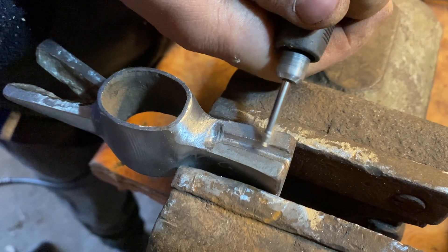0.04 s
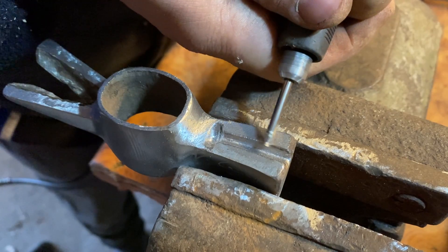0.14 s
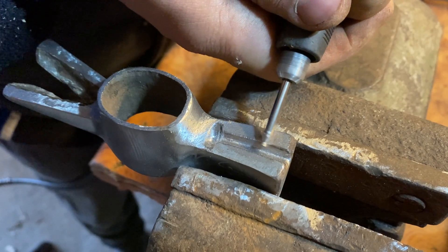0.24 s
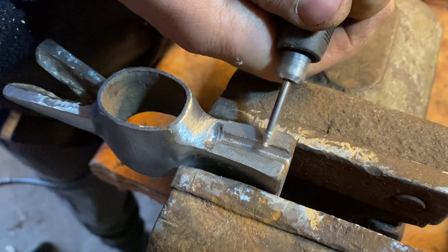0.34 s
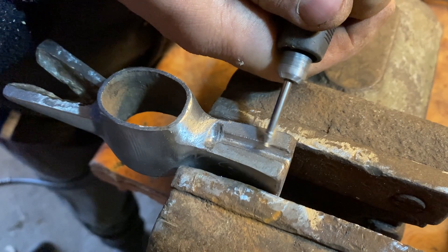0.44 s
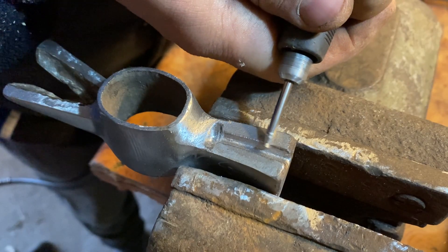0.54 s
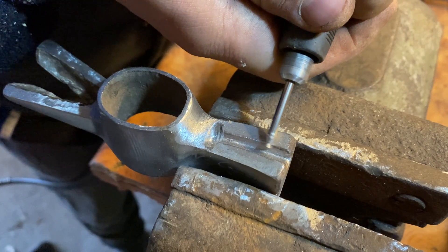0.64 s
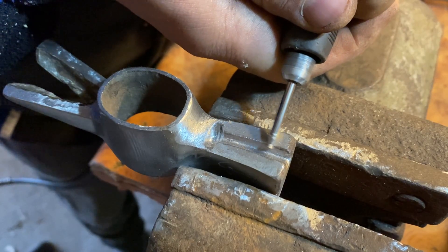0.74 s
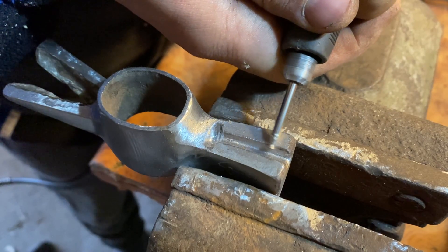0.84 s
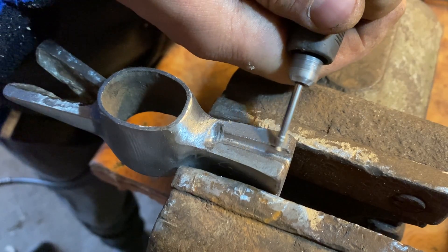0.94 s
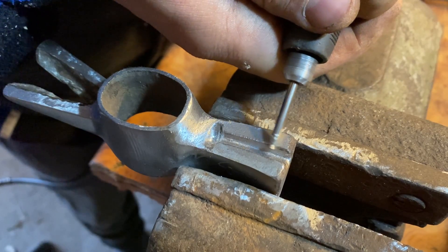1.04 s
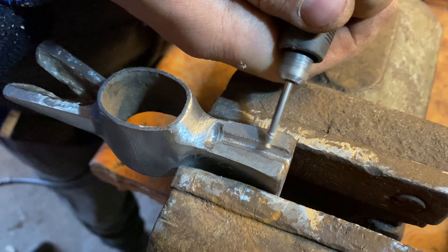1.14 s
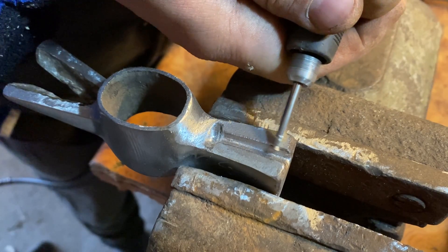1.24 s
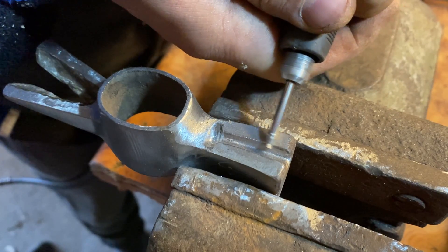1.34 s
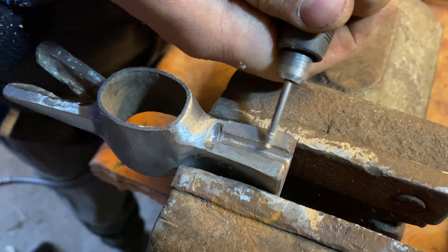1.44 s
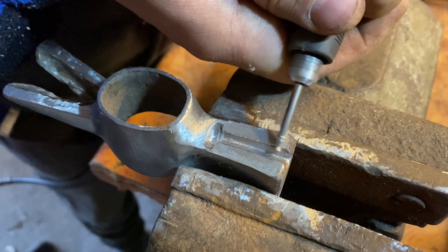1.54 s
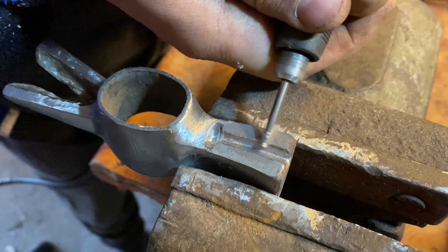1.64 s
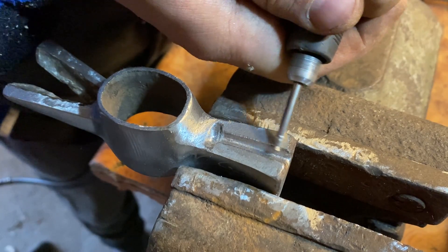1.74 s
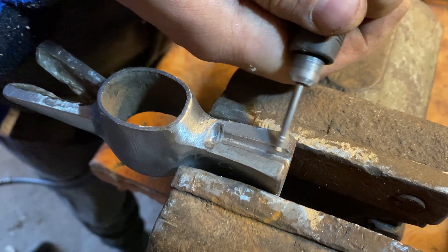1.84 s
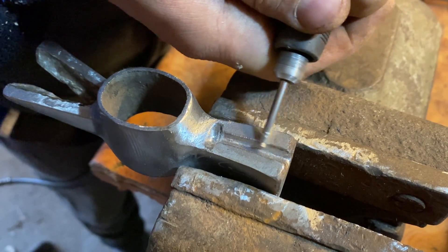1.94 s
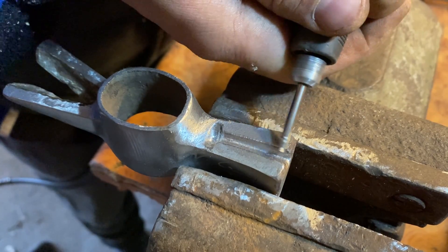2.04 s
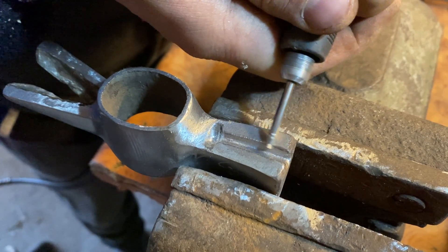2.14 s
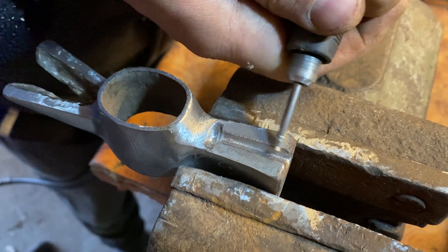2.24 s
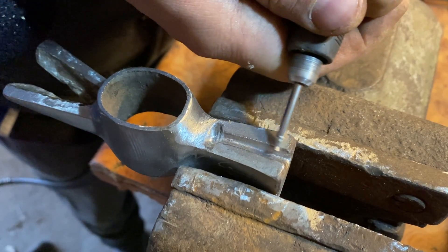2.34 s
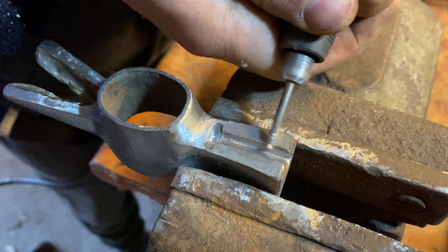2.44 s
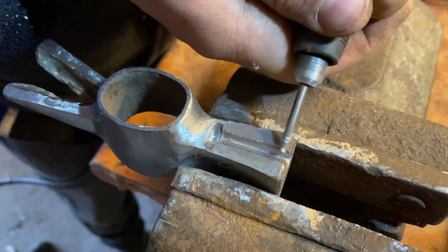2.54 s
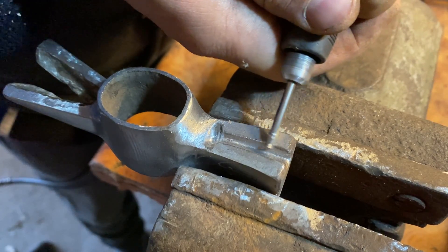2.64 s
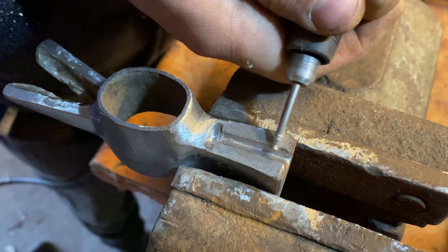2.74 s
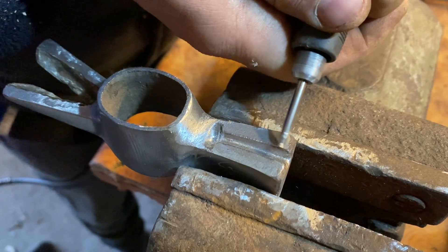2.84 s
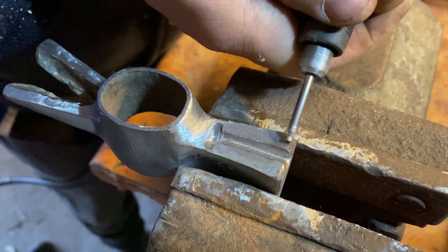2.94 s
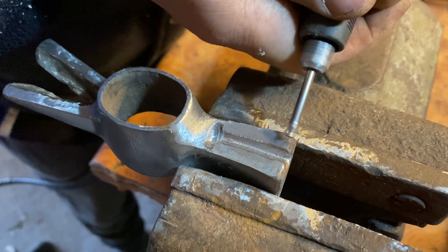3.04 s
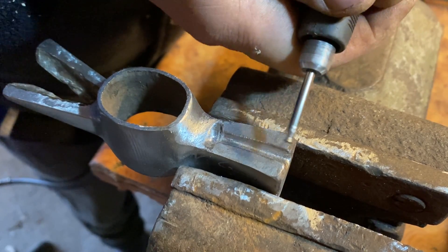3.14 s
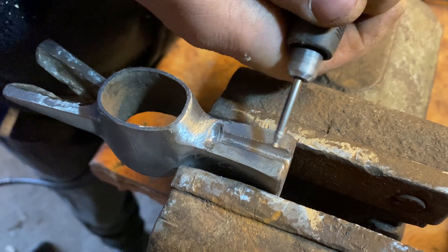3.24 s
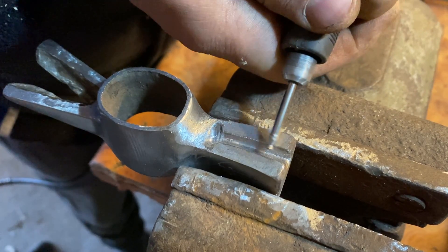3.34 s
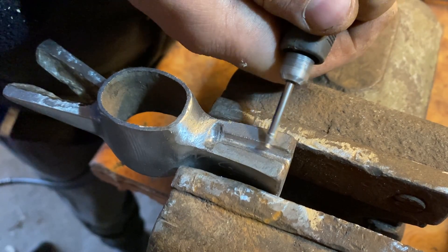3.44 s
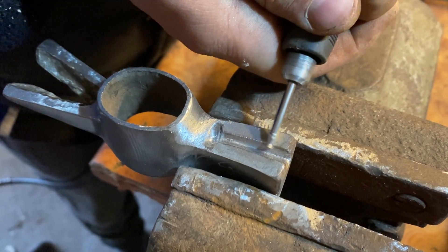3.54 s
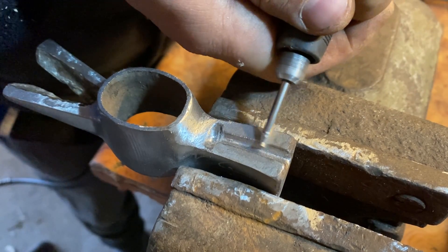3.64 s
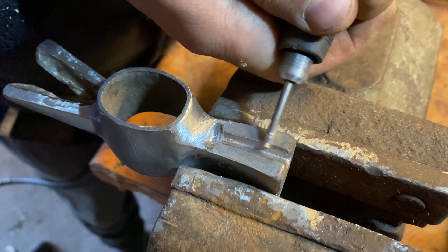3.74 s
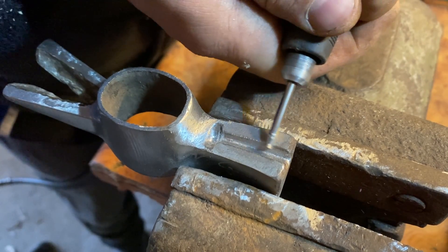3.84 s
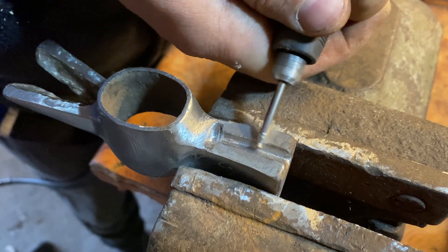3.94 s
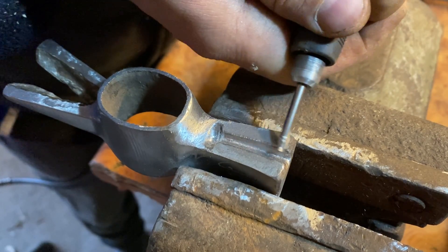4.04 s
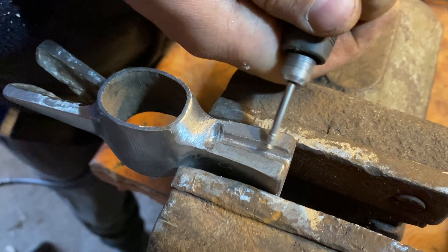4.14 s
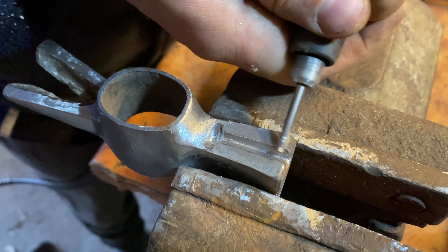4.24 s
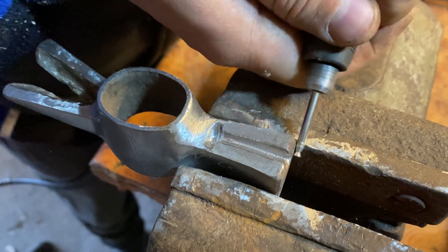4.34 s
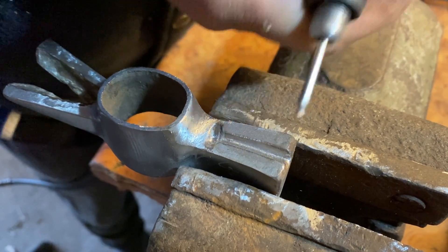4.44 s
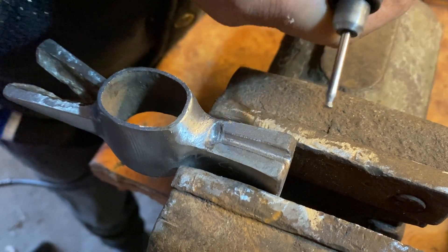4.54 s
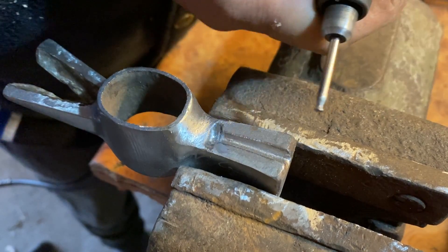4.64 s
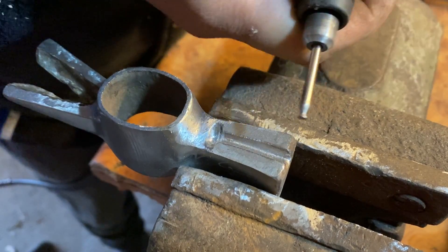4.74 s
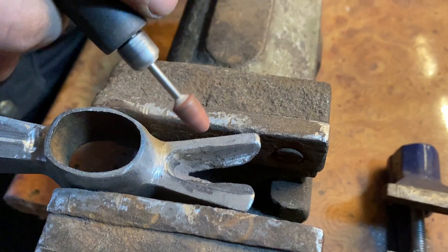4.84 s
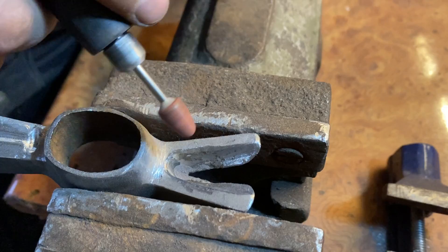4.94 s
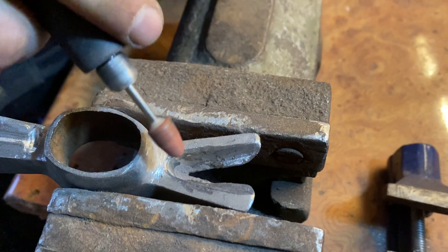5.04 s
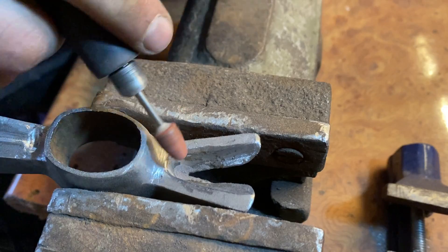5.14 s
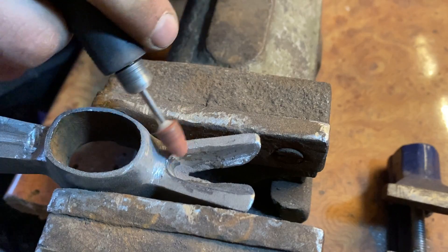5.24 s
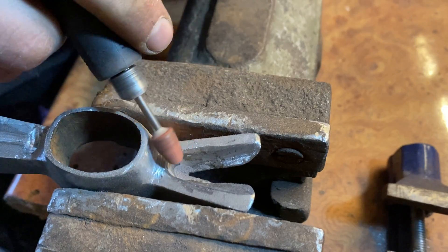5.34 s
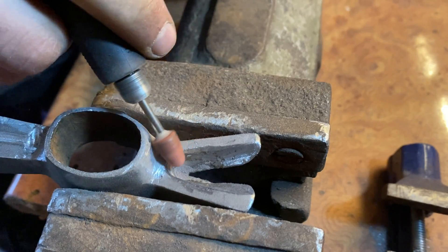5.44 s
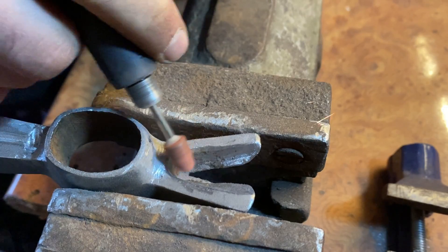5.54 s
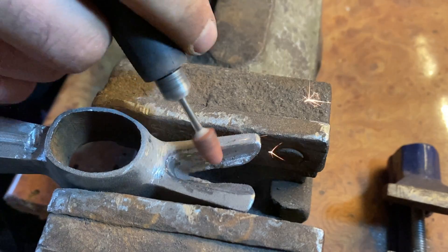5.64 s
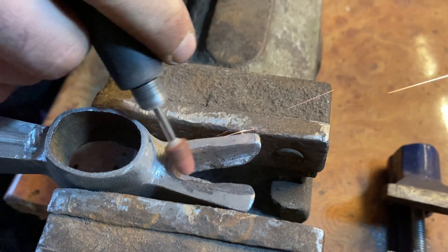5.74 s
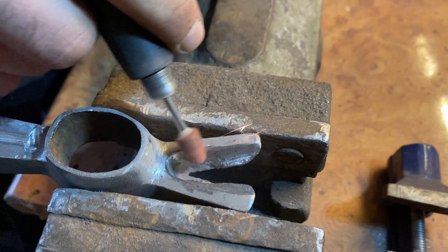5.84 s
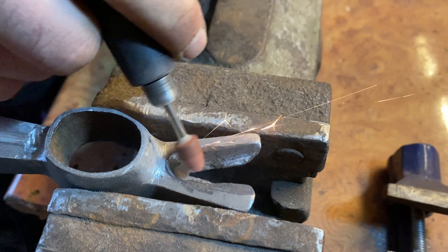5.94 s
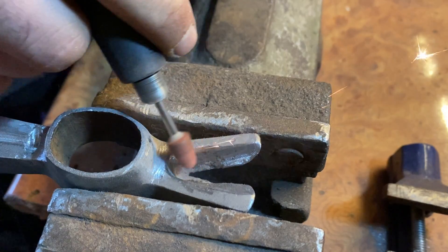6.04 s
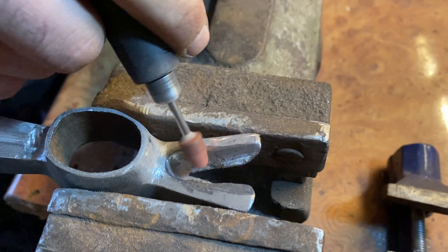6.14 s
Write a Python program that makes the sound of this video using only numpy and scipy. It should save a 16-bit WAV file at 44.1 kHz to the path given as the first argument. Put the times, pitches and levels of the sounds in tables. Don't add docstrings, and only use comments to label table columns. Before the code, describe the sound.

Close up in a workshop, a small high-speed grinder buzzes harshly across steel with brief lift-offs, then a cut to a stone idling, ticking and hissing.

```python
import sys
import numpy as np
from scipy import signal
from scipy.fft import rfft, irfft, next_fast_len
from scipy.io import wavfile
from scipy.ndimage import uniform_filter1d

SR = 44100
rng = np.random.default_rng(int(sys.argv[2]) if len(sys.argv) > 2 else 0)


def attenuation_scalar(level_db):
    decades = np.asarray(level_db, float) / 20
    return 10 ** decades


def int16_out(signal):
    q = np.round(np.clip(np.atleast_2d(signal).T, -1, 1) * 32767)
    wavfile.write(sys.argv[1], SR, q.astype(np.int16))


N = 272963
SIZE = next_fast_len(N, True)
T, HZ = np.arange(N) / SR, np.fft.rfftfreq(SIZE, 1 / SR)
MOVE_S = 4.913


def bites(swing=0.1, uneven_db=1.0, duty=0.39, between=0.92, grit_db=1.5, rumble=0.38, count=3):
    chatter_hz, chatter_turns = 43.5, 0.105
    depth = chatter() * np.where(T < MOVE_S, 1, 0.3)
    whirl = 2 * np.pi * chatter_hz * T
    angle = turns() + chatter_turns * depth * np.sin(whirl + 1.182)
    press = 1 + swing * depth * np.cos(whirl)
    luck = attenuation_scalar(uneven_db * np.clip(rng.standard_normal(3000), -2, 2))[angle.astype(int)]

    spread = np.minimum(np.arange(36) / 12, 1)
    teeth = np.cumsum(rng.uniform(-1, 1, 36) * spread)
    clicks = sum(np.cos(2 * np.pi * k * angle + teeth[k]) for k in range(1, 36))
    clicks *= press * uniform_filter1d(luck, size=120) ** 0.17

    chips = np.minimum(rng.exponential(1, N // 24 + 1), count)
    grit = attenuation_scalar(grit_db * chips).repeat(24)[:N]
    puffs = (between + np.exp(-(angle % 1) / duty)) * press * luck * grit * rng.standard_normal(N)

    shake = evened(press * (np.sin(2 * np.pi * angle) + 0.68 * np.sin(4 * np.pi * angle)))
    return clicks, puffs, shake + rumble * evened(shaped(puffs, band(85, 660)))


def cut(rows, setup, sources, gain, treble_clean=0.63, loosen=0.084, edge=0.0022):
    clicks, puffs, shake = sources
    scrape_db, depth_db, push_db = columns(rows, T)
    knock_db, shake_db = setup
    ring_db = scrape_db + depth_db

    roughened = spell(4.43, 4.56)
    seated_drag, full_drag = 14, 38
    seated = np.clip(drag() / seated_drag, 0.4, 1)
    clean = (0.78 - 0.25 * chatter()) * seated * (1 - roughened)
    firm = 0.98 - loosen * chatter() - 0.85 * roughened

    out = attenuation_scalar(ring_db + shake_db + 0.81 * push_db) * (0.6 + (drag() / full_drag) ** 1.27) * shake
    scrape = scrape_db, band(4880, 27000), treble_clean * clean
    ring = ring_db, band(2150, 6130), clean
    knock = ring_db + knock_db + push_db, band(550, 1820), firm
    for db, edges, share in (scrape, ring, knock):
        c = np.clip(share, 0, 1)
        sharp, rough = (evened(shaped(x, gain * edges)) for x in (clicks, puffs))
        out += attenuation_scalar(db) * (c * sharp + np.sqrt(1 - c ** 2) * rough)
    touch = np.clip(np.minimum(T - rows[0][0], rows[-1][0] + edge - T) / edge, 0, 1)
    return out * touch


# [t/s, level/dB]
LANDINGS = [(5.4172, -18), (5.4407, -14), (5.4473, -16), (5.4572, -14), (5.4667, -14), (5.4783, -18),
            (5.4873, -15), (5.4972, -21), (5.5186, -16), (5.5298, -19), (5.5393, -16), (5.5468, -16),
            (5.5539, -8), (5.5678, -15), (5.5749, -12.5), (5.5868, -15), (5.599, -14)]


def skips():
    graze_every_s, last_graze_s = 0.0052, 5.626
    graze_db, graze_spread_db = -18.5, 2.5
    marks = [s for s, db in LANDINGS] + [last_graze_s]
    grazes = []
    for a, b in zip(marks, marks[1:]):
        gaps = max(round((b - a) / graze_every_s), 1)
        grazes.extend(np.linspace(a, b, gaps + 1)[1:-1])
    levels = graze_db + graze_spread_db * (2 * rng.random(len(grazes)) - 1)
    return LANDINGS + list(zip(grazes, levels))


# [f/Hz, level/dB per Hz]
STONE_SPECTRUM = [(200, -43), (600, -42), (1500, -33.5), (2600, -14), (4200, -17.5), (5400, -25),
                  (6200, -21), (7500, -8), (8200, 11.5), (9300, 7), (10000, 10.5), (11300, 6), (13000, 1.5),
                  (15600, -4)]
# [f/Hz, width/Hz, level/dB over the broad sound]
CLAW_MODES = [(1235, 26, -6), (3250, 120, -1), (4120, 110, 3), (6220, 60, 19.5), (7950, 280, -3.5),
              (11140, 120, 8), (13900, 230, -2)]


def hops(boost_db=2.5, tilt=0.7):
    skip_s = 0.0007
    rows, t = np.array(skips()), np.arange(-100, 100) / SR
    at = np.round(rows[:, :1] * SR).astype(int) + np.arange(-100, 100)
    scratch = rng.standard_normal(at.shape) * np.exp(-(t / skip_s) ** 2)
    gain = body(STONE_SPECTRUM, CLAW_MODES) * (8000 / (HZ + 500)) ** tilt
    strikes = np.zeros(N)
    strikes[at] = scratch
    peak = abs(shaped(strikes, gain)[at[:, 60:140]]).max(axis=1)
    strikes[at] = scratch * (attenuation_scalar(rows[:, 1] + boost_db) / peak)[:, None]
    return shaped(strikes, gain)


def wandering(x, patchy_db=2.2):
    z = signal.stft(x, nperseg=256, noverlap=192)[2]
    patches = rng.standard_normal((z.shape[1] // 32 + 2, 129)).T
    patches = uniform_filter1d(patches, size=2, axis=0)
    patches = evened(uniform_filter1d(patches, size=2, axis=1))
    patches = uniform_filter1d(patches.repeat(32, axis=1), size=32, axis=1)[:, :z.shape[1]]
    return signal.istft(z * attenuation_scalar(patchy_db * patches), nperseg=256, noverlap=192)[1][:N]


# [start t/s, end t/s, build-up t/s]
CHATTER_SPELLS = [
    (1.22, 3.14, .05),
    (3.5, 4.42, .2),
]


def chatter():
    return np.maximum(sum(spell(*row) for row in CHATTER_SPELLS), np.where(T < MOVE_S, 0.04, 1))


# [t/s, drag/turns per s]
CONTACT_DRAG = [
    [(.3, 0), (.45, 10), (.75, 25), (1.05, 29), (1.65, 36), (3.125, 38)],
    [(3.51, 12), (3.6, 20), (3.8, 33), (4, 43), (4.2, 38), (4.3, 33), (4.55, 34)],
    [(5.4, 2), (5.7, 16), (5.9, 33), (6, 46), (6.1, 36), (6.19, 27)],
]


def drag():
    return sum(np.interp(T, *np.transpose(rows), left=0, right=0) for rows in CONTACT_DRAG)


# [no-load/turns per s, first moment/turns per s]
SHAFT_SPEEDS = [
    (361.5, 356.5),
    (426.5, 420),
]


def turns():
    keep = np.exp(-1 / (0.35 * SR))
    loads = np.split(drag(), [round(MOVE_S * SR)])
    speed = []
    for (free, first), load in zip(SHAFT_SPEEDS, loads):
        speed.append(signal.lfilter([1 - keep], [1, -keep], free - load, zi=[keep * first])[0])
    return np.cumsum(np.concatenate(speed)) / SR


# [t/s, nearness as fan level/dB, air outlet toward the microphone level/dB]
TOOL_HOLD = [(0, -42.5, 5.5), (.25, -37, 2.5), (1.3, -31, -4), (3.14, -33, 0.5), (3.5, -31, -2.5),
             (4.56, -36.5, 2.5), (4.72, -36.5, 2.5), (4.912, -39, 7), (4.913, -40.5, 4.5), (6.19, -34, 1.3)]
# [f/Hz, level/dB per Hz]
NEAR_FAN = [(100, -15.5), (300, -14), (600, -9.5), (1200, -1.5), (2200, 2), (3500, 6.5), (5000, 6),
            (7300, 8.5), (9000, 5.5), (12000, 9.5), (13200, 4), (14200, -6), (15600, -2.5)]
FAR_FAN = [(100, -28), (300, -28.5), (600, -28.5), (1200, -20), (2200, -9), (3500, -11), (4500, -8),
           (6500, -10.5), (8200, -1), (11500, -3), (13000, -7), (14500, -12), (15600, -17)]
# [start t/s, end t/s, level/dB]
LIFT_OFFS = [
    (3.12, 3.51, -65),
    (4.56, 5.413, -70.5),
    (5.6, 5.813, -72.5),
]
# [start t/s, end t/s, build-up t/s]
FAN_HUSH = [
    (.4, 3.135, .15),
    (3.513, 4.55, .01),
]


def motor(casing_hz=2770, casing_width=260, pulse=2.7):
    mains_hz = 99.9
    damped_db, hush_db = -88, -6
    near_db, outlet_db = columns(TOOL_HOLD, T)
    loaded = spell(0.22, 3.135, 0.25)
    whine_db = near_db + np.where(T < MOVE_S, -4, -27) - 9 * loaded
    fan_db = near_db - 3 * loaded
    tone_db = damped_db + sum((db - damped_db) * spell(start, end) for start, end, db in LIFT_OFFS)

    current = np.exp(pulse * np.cos(2 * np.pi * mains_hz * T + 2.1))
    bars = current * np.sin(2 * np.pi * 8 * turns())
    whine = shaped(bars, 1 / (1 + 2j * (HZ - casing_hz) / casing_width) ** 2)
    whine /= np.sqrt(uniform_filter1d(whine ** 2, size=4410) + 1e-12)

    air = rng.standard_normal(N) * (1 + 0.2 * np.cos(2 * np.pi * mains_hz * T + 3.6))
    fan = np.where(T < MOVE_S, evened(shaped(air, body(NEAR_FAN))), evened(shaped(air, body(FAR_FAN))))
    fan += (attenuation_scalar(outlet_db) - 1) * shaped(fan, band(6400, 20000))
    hush = sum(spell(*row) for row in FAN_HUSH)
    fan += (attenuation_scalar(hush_db * hush) - 1) * shaped(fan, band(250, 2500))

    once = np.where(T < MOVE_S, 0.4, 0.82) * np.sin(2 * np.pi * turns())
    tones = once + 1.2 * np.sin(4 * np.pi * turns())
    return attenuation_scalar(whine_db) * whine + attenuation_scalar(fan_db) * fan + attenuation_scalar(tone_db) * np.sqrt(2) * tones


def ports(x, rows):
    turn_hz, scatter_s = 4290, 0.03
    lead, alike, balance_db = columns(rows, HZ)
    lead = lead + 2 * np.pi * np.maximum(HZ - rows[-1][0], 0) / turn_hz
    alike = np.clip(alike, 0, 1)
    tail = rng.standard_normal(6000) * np.exp(-np.arange(6000) / SR / scatter_s)
    scattered = rfft(tail / np.linalg.norm(tail), SIZE)
    half, mixed = np.exp(.5j * lead) / attenuation_scalar(balance_db / 2), np.arccos(alike) / 2
    left = (np.cos(mixed) + np.sin(mixed) * scattered) / half
    right = (np.cos(mixed) - np.sin(mixed) * scattered) * half
    return shaped(x, np.array([left, right]))


# [f/Hz, level/dB per Hz]
RUMBLE_SPECTRUM = [(12, -71), (20, -53), (49, -29), (87, -5), (128, 0.5), (385, -8), (400, -0.5), (520, -2),
                   (880, -120)]


def shop():
    rumble = evened(shaped(rng.standard_normal(N), body(RUMBLE_SPECTRUM) * band(45, 450)))
    hum = np.sqrt(2) * np.sin(2 * np.pi * 60 * T)
    return attenuation_scalar(-72 - 3.7 * (T > MOVE_S)) * hum + attenuation_scalar(-77 + 10 - 2.1 * T) * rumble


def evened(x):
    return x / np.sqrt(np.mean(x ** 2) + 1e-20)


def columns(rows, at):
    first, *rest = np.transpose(rows)
    return [np.interp(at, first, c) for c in rest]


def shaped(x, gain):
    return irfft(rfft(x, SIZE) * gain, SIZE)[..., :N]


def body(points, modes=()):
    f, db = np.transpose(points)
    rings = sum(attenuation_scalar(d) / (1 + 2j * (HZ - hz) / width) for hz, width, d in modes)
    return attenuation_scalar(np.interp(np.log(HZ + 1), np.log(f), db)) * (1 + rings)


def band(lo_hz, hi_hz):
    return 1 / np.sqrt((1 + (lo_hz / (HZ + 1)) ** 12) * (1 + (HZ / hi_hz) ** 12))


def spell(start, end, rise=0.0072):
    return np.clip(np.minimum((T - start) / rise, (end - T) / .004), 0, 1)


# [t/s, pressure as scrape level/dB, depth as ring over scrape level/dB,
# push toward the vice level/dB]
SKIM_CONTROL = [(.06, -56, -22, 7), (.1, -36.5, -28, 12), (.22, -34, -12, -7), (.255, -29, -9.5, -9),
                (.4, -22.5, -9.5, -9), (.65, -21.5, -9, -2.5), (1.04, -22, -15.5, 0.5), (1.2, -23, -10, -3),
                (1.25, -25, -8.5, -9)]
LONG_CONTROL = [(1.248, -23.5, -15.5, 5.5), (1.42, -24, -8, -1.3), (1.9, -25.5, -7.5, -3),
                (1.94, -24, -5, -2.7), (2.06, -26.5, 1.4, -5), (2.3, -27, 1.5, -2.5),
                (2.85, -27.5, -0.1, -6), (3.08, -26, 1, -3.5), (3.132, -29.5, 4.3, -5.5)]
SHORT_CONTROL = [(3.514, -27, 5, -7), (3.56, -25, 1.7, 4.5), (4.015, -30.5, 4.5, -0.5),
                 (4.11, -25.5, 3.3, -6.5), (4.15, -28, 1.5, 1), (4.41, -30.5, 5, -3),
                 (4.457, -22, -0.5, 5.5), (4.5, -23.5, -3.5, -2), (4.549, -26, -2.5, 4.5)]
STONE_CONTROL = [(5.6, -38, 4, -9), (5.642, -30.5, -11, -10), (5.712, -28.5, -14, -18),
                 (5.746, -23, -14, -12), (5.78, -29, -35, -4), (5.808, -26, -9.5, -8),
                 (6.054, -22.5, -15.5, -6), (6.09, -26.5, -8, -13), (6.19, -25, -10, -8)]
# [vice knock over ring level/dB, handle shake over ring at half drag level/dB]
PASS_SETUP = [
    (-10.5, -22.5),
    (-14, -26.5),
    (-18, -36),
    (-10, -36),
]
# [f/Hz, level/dB per Hz]
SKIM_SPECTRUM = [(200, -27), (600, -43), (1200, -11.5), (2300, -15), (3400, -8), (5000, -7.5), (6300, -5.5),
                 (7500, 0.5), (9500, 6), (10200, 5), (11000, 8.5), (12500, 4.5), (13500, -2), (15600, -9)]
BURR_SPECTRUM = [(200, -58), (600, -20), (1200, -8.5), (2200, -7), (3400, -3.5), (4300, -4), (5100, -3.5),
                 (6200, -3.5), (8500, 8), (9500, 8.5), (10200, 10.5), (11500, 10.5), (13300, 5),
                 (15600, -7.5)]
# [f/Hz, width/Hz, level/dB over the broad sound]
HEAD_MODES = [(1000, 210, -0.5), (1390, 104, -4.5), (1690, 70, 10), (3006, 88, 1.5), (3115, 53, 4),
              (3443, 180, 2), (3840, 130, -1.5), (5060, 190, -5), (7650, 160, -23), (9500, 85, 8),
              (10890, 100, 2)]
# [f/Hz, right leads/rad, likeness/0-1, left over right level/dB]
BURR_PORTS = [(0, 0, 1, 0), (100, -.3, 1, 0), (180, -1, 1, 0), (330, -1.6, 1, 0), (750, -1.3, .95, 0),
              (1200, -.8, .8, .5), (2200, -1.2, .55, 3), (3200, -.6, .7, 4.5), (4600, -1.1, .55, 4.5),
              (6000, -1.1, .6, 3), (6870, 0, .985, 0)]
STONE_PORTS = [(0, 0, 1, 0), (1150, 0, 1, 0), (1500, -2.8, .75, 1), (1850, -3.4, .55, 2),
               (2500, -3.8, .5, 3.5), (3500, -6.1, .9, 2), (4200, -6.3, .85, 2), (4700, -8.4, .5, 2),
               (5850, -9.5, .45, 1), (6150, -7.2, .8, 0), (6870, -6.283, .985, 0)]


def scene():
    sources = bites()
    burr = body(BURR_SPECTRUM, HEAD_MODES)
    passes = SKIM_CONTROL, LONG_CONTROL, SHORT_CONTROL, STONE_CONTROL
    bodies = body(SKIM_SPECTRUM, HEAD_MODES), burr, burr, body(STONE_SPECTRUM, CLAW_MODES)
    contacts = zip(passes, PASS_SETUP, bodies)
    steel = wandering(sum(cut(rows, setup, sources, gain) for rows, setup, gain in contacts))
    tool = motor() + steel + hops()
    return np.where(T < MOVE_S, ports(tool, BURR_PORTS), ports(tool, STONE_PORTS)) + shop()


def top_cut(x):
    return signal.sosfilt(signal.butter(12, 17040, fs=SR, output="sos"), x)


def record(dry):
    limited = shaped(dry, HZ < 15900)
    return top_cut(limited)


dry = scene()
out = record(dry)
int16_out(out)
```